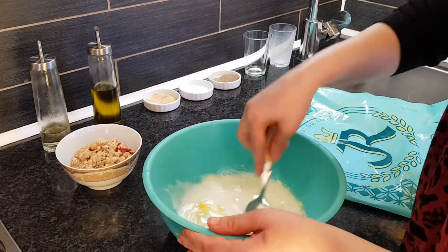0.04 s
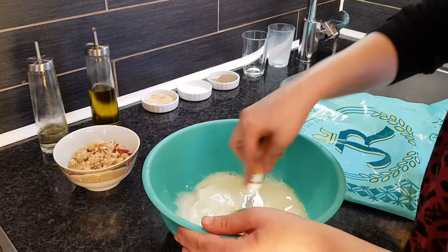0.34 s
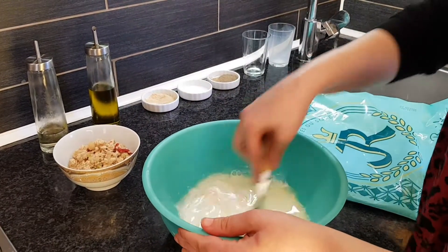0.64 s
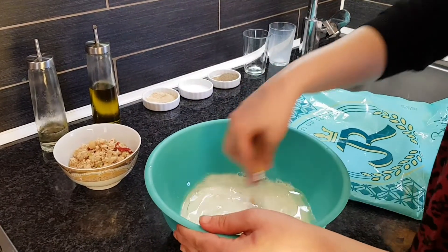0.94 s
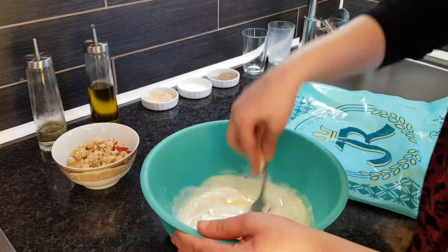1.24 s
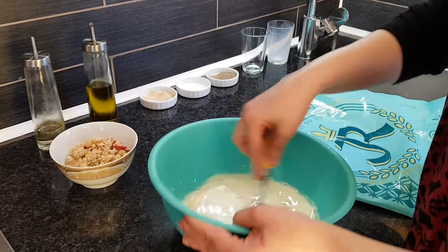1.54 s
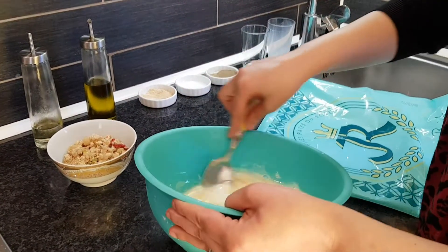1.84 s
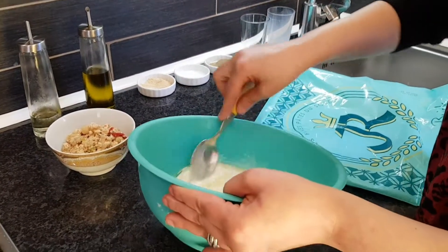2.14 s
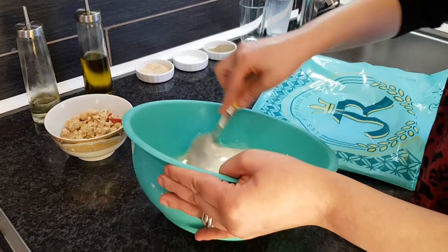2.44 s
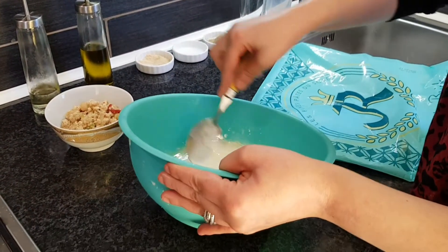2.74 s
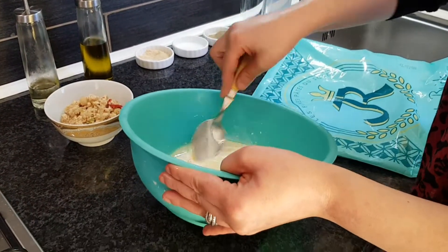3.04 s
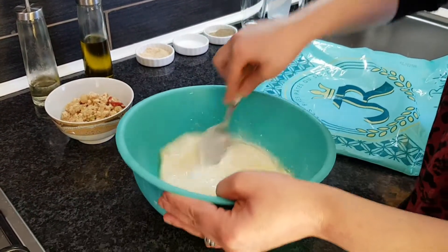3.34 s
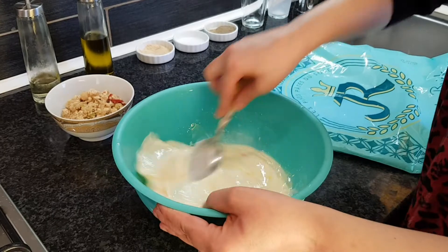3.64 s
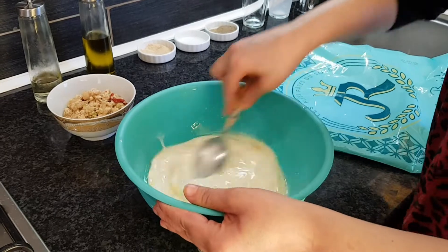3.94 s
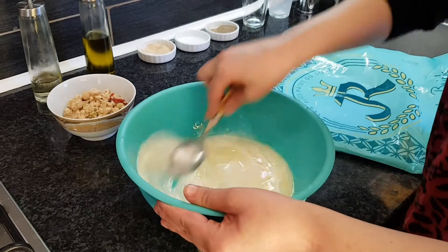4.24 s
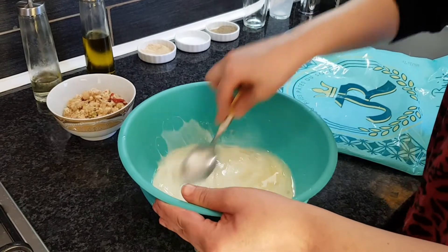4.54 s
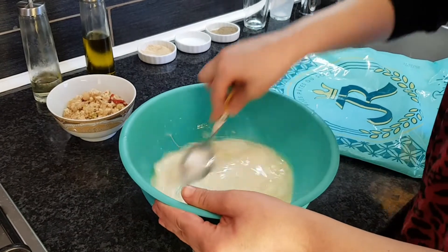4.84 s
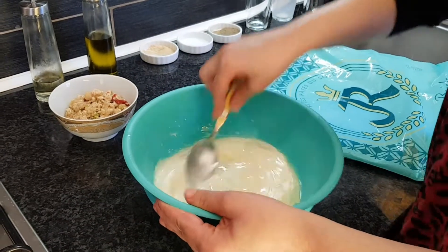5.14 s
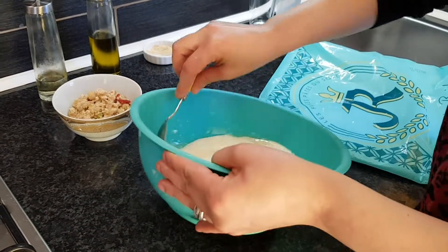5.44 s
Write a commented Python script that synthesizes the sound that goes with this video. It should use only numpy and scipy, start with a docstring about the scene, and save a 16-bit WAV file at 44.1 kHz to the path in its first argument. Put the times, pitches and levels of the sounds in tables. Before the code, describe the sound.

Close to the microphone and slightly left, a spoon works quickly through runny batter in a plastic bowl. Irregular hollow clacks and short scrapes mix with sticky swishes and bubbling plops. The batter goes quieter for a moment in the middle, then comes back wetter and busier. The bowl thumps softly as it rocks and the spoon clinks now and then, in a quiet tiled kitchen.

```python
"""A tiled kitchen, with a stereo microphone close to a hand-held plastic bowl on the counter.
A metal spoon beats a thin batter, about three turns a second. It knocks on wall and base, scrapes
along the plastic and now and then clinks; the batter slops, and air trapped in it squelches and plops.
The bowl, a little to the left, thumps as it rocks, and the tiles answer with a short tail."""
import sys
import numpy as np
from scipy import signal
from scipy.fft import rfft, irfft
from scipy.io import wavfile

SR = 44100
rng = np.random.default_rng(int(sys.argv[2]) if len(sys.argv) > 2 else 0)


def wrap_up_sound(samples):
    """Save the sound to the file named by the first command line argument, as 16-bit audio."""
    columns = np.atleast_2d(samples).T
    # keep every value between -1 and 1, then stretch to whole-number steps
    tamed = np.clip(columns, -1, 1)
    steps = np.round(tamed * 32767).astype(np.int16)
    wavfile.write(sys.argv[1], SR, steps)


N = 246739
RING_S = np.arange(8192) / SR  # time axis of one short sound
ONSET_SAMPLES = round(.02 * SR)

# spoon against bowl: start_s, level_db, depth (0 high on the wall, 1 on the base),
# coat (0 bare blade, 1 thick with batter), wall_pitch_hz
KNOCKS = [(0.558, -34.5, 1, 0.83, 1260), (0.569, -26, 0.49, 0.35, 1136), (0.597, -31, 0.84, 0.27, 1105),
          (0.835, -28, 0.83, 0.64, 1090), (0.856, -23, 0.53, 0.37, 1146), (0.867, -29.5, 0.068, 0.33, 1092),
          (0.9318, -23.5, 0.59, 0.77, 1145), (1.1725, -32, 0.58, 0.5, 1197), (1.366, -32, 0.36, 1, 1153),
          (1.4729, -33.5, 0.28, 0.3, 1160), (1.723, -45.5, 0.24, 1, 1210),
          (1.8093, -28.5, 0.34, 0.64, 1160), (1.816, -33.5, 0.21, 0.75, 1240),
          (1.8319, -29.5, 0.26, 0.22, 1280), (1.868, -33.5, 0.2, 0.44, 1110),
          (2.177, -43.5, 0.39, 0.9, 1150), (2.1821, -36, 0.4, 0.8, 1180), (2.2317, -30, 0.41, 0.16, 1196),
          (2.522, -36, 0.38, 0.2, 1340), (2.5563, -36, 0.32, 0.1, 1160), (2.8417, -33.5, 0.046, 0.7, 1170),
          (2.879, -25.5, 0.89, 0.43, 1116), (2.886, -39.5, 0.44, .7, 1080),
          (3.1349, -29.5, 0.36, 0.3, 1090), (3.239, -35, 0.058, 0.89, 1487), (3.342, -29, 0.047, 1, 1240),
          (3.437, -32, 0.16, 0.43, 1150), (3.507, -27, 0.41, 0.91, 1308), (3.596, -33.5, 0.08, 0.4, 1390),
          (3.7618, -30.5, 0.83, 0.3, 1160), (3.8136, -21, 0.57, 0.6, 1152), (4.064, -28, 0.79, 0.52, 1170),
          (4.1394, -23, 0.57, 0.42, 1064), (4.365, -30, 0.96, 0.64, 1110), (4.387, -27.5, 0.73, 0.56, 1120),
          (4.6218, -33, 0.76, 0.9, 1060), (4.718, -22.5, 0.54, 0.9, 1044),
          (4.9131, -33.5, 0.87, 0.88, 1390), (4.9442, -30, 0.33, 0.8, 1175),
          (5.0133, -31, 0.89, 0.84, 1090), (5.0205, -32, .8, 0.7, 1055), (5.094, -31, 0.71, 0.44, 1170),
          (5.375, -29, 0.78, 0.06, 1194), (5.529, -22, 0.14, 0.2, 1155), (5.57, -32, 0.62, 0.24, 1150)]
# spoon sliding over plastic: peak_s, length_s, level_db, depth (as above), wetness (0 to 1)
SCRAPES = [(0.057, 0.053, -43.5, 0.52, 0), (0.202, 0.029, -39, 0.34, 0.3), (0.309, 0.039, -38, 0.87, 0.36),
           (0.489, 0.048, -43.5, 0.6, 0.19), (0.654, 0.0073, -40, 0.77, 0.57), (0.797, 0.077, -48, 0.54, 0),
           (1.04, 0.11, -43, 0.16, 0.56), (1.21, 0.054, -41, 0.19, 0.05), (1.391, 0.042, -47.5, 0.59, 0),
           (1.47, 0.045, -36, 0.34, 0.33), (1.607, 0.023, -44.5, 0.2, 0.24), (1.776, 0.082, -48, 0.1, 0.18),
           (1.855, 0.0058, -74, .18, 0.1), (1.948, 0.029, -43.5, 0.35, 0.48),
           (2.226, 0.055, -49.5, 0.38, 0), (2.286, 0.028, -44.5, 0.62, 0.61),
           (2.533, 0.022, -48.5, 0.25, 0.06), (2.601, 0.031, -49.5, 0.6, 0.3),
           (2.919, 0.02, -46.5, 0.57, 0.74), (3.101, 0.058, -60, 0.62, 0.9),
           (3.192, 0.086, -45.5, 0.88, 0.72), (3.248, 0.03, -37.5, 0.038, 0.24),
           (3.347, 0.026, -37, 0.034, 0.4), (3.402, 0.044, -39.5, 0.12, 0.3),
           (3.506, 0.061, -38, 0.21, 0.6), (3.559, 0.032, -55, 0.3, 0), (3.661, 0.054, -39, 0.18, 0.32),
           (3.949, 0.061, -40.5, 0.074, 0.3), (4.094, 0.07, -39.5, 0.55, 0),
           (4.25, 0.053, -38.5, 0.13, 0.53), (4.406, 0.06, -38, 0.42, 0.4),
           (4.57, 0.049, -41.5, 0.49, 0.42), (4.68, 0.048, -44.5, 0.33, 0.56),
           (4.841, 0.054, -43, 0.074, 0.45), (4.968, 0.033, -45, .13, 0.4), (5.139, 0.064, -42, 0.64, 0),
           (5.514, 0.065, -45, 0.56, 0.88)]
# modes of the batter-laden base: pitch_hz, level_db, t60_s
BASE_MODES = [(200, -12.5, 0.04), (283, -2.5, 0.061), (366, -3, 0.091), (426.5, -7.5, 0.058),
              (513, -5, 0.12), (737, -5.5, 0.05), (730, 19, 0.0046), (836, 5, 0.033), (913, -5, 0.08),
              (1014, -13, 0.025)]
# modes of the bare wall: multiple_of_wall_pitch, level_db, t60_s
WALL_MODES = [(.88, -4, 0.015), (1, -3, 0.042), (1.14, 5, 0.002), (1.36, -2, 0.016), (1.56, -14, 0.013),
              (2.03, -25.5, 0.025), (2.4, -21, 0.019)]
# spectra of struck plastic, scraped plastic, and fine ticks and fizz: frequency_hz, level_db
CLACK_SPECTRUM = [(500, -8), (1200, -3.5), (1750, 2), (2300, 4), (2850, 3), (3300, -5), (5000, -11),
                  (7000, -23.5), (16000, -60.5)]
RASP_SPECTRUM = [(500, -30), (1200, -14), (1750, 3.5), (2300, 3.5), (2850, 0), (3400, -4), (5000, -9),
                 (7000, -21.5), (16000, -39.5)]
FIZZ_SPECTRUM = [(2500, -38), (5200, 1), (7300, -1), (10500, -0.5), (12000, -2), (13500, -7.5),
                 (16000, -10)]
# likeness of the microphone's two channels: frequency_hz, correlation
CHANNEL_LIKENESS = [(60, 0.9), (350, 0.98), (800, 0.61), (1300, 0.47), (2400, -0.069), (4500, 0.16),
                    (7000, -0.39), (16000, 0.38)]


def amp(db):
    """Decibels to amplitude."""
    return 10 ** (np.asarray(db) / 20)


def unit_rms(x):
    """Scales to rms 1."""
    return x / np.sqrt(np.mean(x ** 2) + 1e-20)


def unit_onset(x, size=ONSET_SAMPLES):
    """Scales so that the start of a blow has rms 1."""
    return x / np.sqrt(np.mean(x[..., :size] ** 2) + 1e-20)


def value_at(points, hz):
    """Reads a table on a log-frequency axis."""
    points_hz, values = np.transpose(points)
    return np.interp(np.log(hz + 1), np.log(points_hz + 1), values)


def add(mix, start_s, sound):
    """Mixes a sound in at its start time."""
    part = mix[:, max(round(start_s * SR), 0):][:, :sound.shape[-1]]
    part += sound[..., :part.shape[1]]


def pan(sound, side):
    """Places a sound between right (0) and left (1) at equal power."""
    return sound * np.sqrt([[side], [1 - side]])


def convolve(x, response):
    """Passes a signal through a response, keeping its length."""
    return signal.fftconvolve(np.atleast_2d(x), np.atleast_2d(response), axes=1)[:, :x.shape[-1]]


def colour(x, spectrum, size=4096):
    """Minimum-phase filter with the given spectrum."""
    log_gain = np.log(amp(value_at(spectrum, abs(np.fft.fftfreq(size, 1 / SR)))))
    response = np.fft.ifft(np.exp(np.conj(signal.hilbert(log_gain)))).real
    return convolve(x, response[:size // 2])


def mic_pair(x):
    """Makes two unrelated signals alike in the bass, as the stereo microphone hears them."""
    left, other = rfft(x)
    likeness = np.clip(value_at(CHANNEL_LIKENESS, np.fft.rfftfreq(x.shape[1], 1 / SR)), -1, 1)
    right = likeness * left + np.sqrt(1 - likeness ** 2) * other
    return irfft([left, right], x.shape[1])


def grains(per_s, spread_db):
    """Random clicks of uneven size, rms 1."""
    size = amp(spread_db * np.minimum(rng.exponential(1, N), 4)) * rng.choice([-1, 1], N)
    return unit_rms(size * (rng.random(N) < per_s / SR))


def clumps(per_s, depth_db):
    """Sticky batter holds and lets go in spurts: an uneven gain, rms 1."""
    t = np.arange(N) / SR
    hold = np.clip(rng.standard_normal(N), -2, 2)
    return unit_rms(amp(depth_db * np.interp(t * per_s, np.arange(N), hold)))


def scatter(t60_s):
    """A click bouncing about inside the bowl: dying stereo noise."""
    return mic_pair(rng.standard_normal((2, len(RING_S)))) * amp(-60 * RING_S / t60_s)


def burst(spectrum, t60_s):
    """A scattered click with the given spectrum."""
    return colour(scatter(t60_s), spectrum)


def ring(modes, scale=1, *, detune, uneven_db):
    """Dying modes; their strength, pitch and phase in each channel depend on the spot touched."""
    out = np.zeros((2, len(RING_S)))
    for pitch, db, t60_s in modes:
        gain, shift, phase = rng.standard_normal(3)
        hz = pitch * scale * (1 + detune * shift)
        phase_gap = np.arccos(np.clip(value_at(CHANNEL_LIKENESS, hz), -1, 1))
        lag = phase_gap * rng.choice([-.5, .5]) * np.array([[1], [-1]])
        envelope = amp(db + uneven_db * gain - 60 * RING_S / t60_s)
        out += envelope * np.sin(2 * np.pi * (hz * RING_S + phase) + lag)
    return out * (1 - np.exp(-RING_S / 0.00045))


def bubble(hz, cycles, glide):
    """A pocket of air rings briefly, rising in pitch as it dies."""
    age = RING_S * hz / cycles
    tone = np.sin(2 * np.pi * hz * RING_S * (1 + glide * np.minimum(age, 2)))
    return tone * np.exp(-3 * age) * (1 - np.exp(-12 * age))


def wander(x, responses, rounds_per_s):
    """Hands the signal from one response to the next as the spoon moves."""
    count, t = len(responses), np.arange(x.shape[-1]) / SR
    out = 0
    for k, response in enumerate(responses):
        away = abs((t * rounds_per_s * count - k + count / 2) % count - count / 2)
        share = np.cos(np.pi / 2 * np.minimum(away, 1))
        out = out + convolve(x * share, response / np.sqrt(np.sum(response ** 2) / 2))
    return out


def wall_and_base(db, depth):
    """Shares a level between wall and base by how deep in the bowl the spoon touches."""
    angle = np.pi / 2 * np.clip(depth, .02, .98)
    return db + 20 * np.log10([np.cos(angle), np.sin(angle)])


def strokes(rise_share=.53):
    """Yields for each scrape: peak_s, rise_s, fall_s, wall_db, base_db, rasp_db, fizz_db."""
    for peak_s, length_s, db, depth, wetness in SCRAPES:
        # a wet film lets the blade glide, so the bowl rings less and the film fizzes more
        wall_db, base_db = wall_and_base(db + 6.5 - 17 * wetness, depth)
        fizz_db = db - 36 + 33 * wetness
        yield peak_s, length_s * rise_share, length_s * (1 - rise_share), wall_db, base_db, db, fizz_db


def dragging(slack_db=10, stroke_s=0.12):
    """How much batter is on the move; it settles between strokes."""
    # batter dragged by the spoon: time_s, level_db
    # the bowl is tipped from 1.7 to 3.1 s and again near the end, leaving the blade clear
    stirring = [(0, -36.5), (.14, -53), (.3, -42), (.6, -46), (.85, -42.5), (1.38, -43), (1.6, -48.5),
                (2.0, -84), (3.0, -67.5), (3.27, -45), (3.42, -61), (3.54, -38), (3.66, -39.5), (3.78, -33),
                (3.88, -40.5), (4.0, -42), (4.2, -46.5), (4.4, -50), (4.62, -44), (5.14, -40.5),
                (5.27, -58), (5.59, -41)]
    t = np.arange(N) / SR
    speed = np.max([np.exp(-((t - peak_s) / stroke_s) ** 2) for peak_s, *_ in SCRAPES], axis=0)
    return amp(np.interp(t, *np.transpose(stirring)) + slack_db * (speed - 1))


def batter(slop_db=-3, swish_db=-5, wave_db=-9, settle_s=0.053):
    """Batter slops in coarse lumps and swishes with fine bursting films; deep knocks push up a wave."""
    # spectra of the lumps and of the films: frequency_hz, level_db
    slop_spectrum = [(30, -46), (70, -4), (140, -11), (290, 4.5), (360, 7), (440, 7), (530, 5), (630, 4),
                     (820, 0), (1150, 8.5), (1600, -36), (3000, -45.5)]
    swish_spectrum = [(500, -27.5), (1200, 10.5), (2750, 4.5), (3400, -7.5), (5200, -18), (7300, -24.5),
                      (11500, -20), (16000, -47)]
    t, drag = np.arange(N) / SR, dragging()
    wave = sum(amp(db) * depth * coat * (t > start_s) * np.exp(-abs(t - start_s) / settle_s)
               for start_s, db, depth, coat, _ in KNOCKS)
    lumps = np.hypot(amp(slop_db) * drag, amp(wave_db) * wave) * grains(per_s=200, spread_db=3.5)
    films = amp(swish_db) * drag * grains(per_s=450, spread_db=1.5) * clumps(per_s=90, depth_db=3)
    slop = wander(lumps, [burst(slop_spectrum, t60_s=0.037) for _ in range(5)], rounds_per_s=2.3)
    swish = wander(films, [burst(swish_spectrum, t60_s=0.017) for _ in range(7)], rounds_per_s=2.8)
    return slop + swish


def gurgle(level_db=-2.5, low_hz=420, high_hz=2600, spread_db=16, small_db=-5, count=220):
    """Air folded into the batter pops all through the stirring: hollow blips, some loud, some faint."""
    out = np.zeros((2, N))
    drag = dragging()
    for when, smallness, strength, side in rng.random((count, 4)):
        at = int(when * N)
        blip = bubble(low_hz * (high_hz / low_hz) ** smallness, cycles=17, glide=0.058)
        gain = drag[at] * amp(level_db + spread_db * strength + small_db * smallness)
        add(out, at / SR, pan(gain * blip, side))
    return out


def squelches(pop_db=-1, spit_db=-3, pitch_spread=0.22, spacing_s=0.0027, fade_db=1, count=4):
    """A pocket bursts with one wet spit and a quick run of tiny rising pops, each fainter."""
    # pockets of batter squeezed out from under the blade: start_s, level_db, pitch_hz
    pockets = [(0.0228, -47, 1350), (0.035, -40.5, 1500), (0.173, -57, 2060), (0.19, -47, 1840),
               (0.285, -49, 960), (0.312, -35, 1270), (0.589, -33.5, 1044), (0.75, -46.5, 1000),
               (1.201, -51, 1370), (1.443, -55, 1460), (1.59, -54, 1720), (1.678, -57, 1290),
               (3.082, -56.5, 4630), (3.112, -54.5, 2860), (3.318, -40, 1270), (3.534, -38, 1620),
               (3.558, -36, 940), (3.64, -39, 1770), (3.672, -41, 1660), (3.945, -47.5, 3500),
               (3.893, -44, 2000), (4.376, -40.5, 3650), (4.53, -48, 880), (4.557, -40.5, 1800),
               (4.651, -37.5, 1350), (4.835, -58, 1810), (5.127, -34.5, 1284)]
    out = np.zeros((2, N))
    for start_s, db, middle_hz in pockets:
        add(out, start_s, amp(db + spit_db) * unit_onset(burst(CLACK_SPECTRUM, t60_s=0.075)))
        for k, (late, pitch, side) in enumerate(rng.random((count, 3))):
            hz = middle_hz * np.exp(pitch_spread * (2 * pitch - 1))
            pop = amp(db + pop_db - fade_db * k) * unit_onset(bubble(hz, cycles=12, glide=0.017))
            add(out, start_s + (k + late) * spacing_s, pan(pop, side))
    return out


def scrapes(wall_hz=1230, wall_db=-3, base_db=-2, rasp_db=0.43, fizz_db=-1):
    """Tiny slips under the pressure of each stroke rasp and ring wall and base; wet films fizz."""
    t = np.arange(N) / SR
    power = np.zeros((4, N))
    for peak_s, rise_s, fall_s, *levels_db in strokes():
        pressure = np.exp(-((t - peak_s) / np.where(t < peak_s, rise_s, fall_s)) ** 2)
        power += amp(levels_db)[:, None] ** 2 * pressure
    wall, base, rasp, fizz = np.sqrt(power) * grains(per_s=1100, spread_db=2.5)
    rasp *= clumps(per_s=120, depth_db=2.5)
    fizz *= clumps(per_s=150, depth_db=3)
    wall_spots = [ring(WALL_MODES, wall_hz, detune=0.184, uneven_db=13.5) for _ in range(7)]
    base_spots = [ring(BASE_MODES, detune=0.018, uneven_db=0.5) for _ in range(5)]
    rasp_spots = [burst(RASP_SPECTRUM, t60_s=0.013) for _ in range(9)]
    fizz_spots = [burst(FIZZ_SPECTRUM, t60_s=0.0011) for _ in range(5)]
    return (amp(wall_db) * wander(wall, wall_spots, rounds_per_s=1.1)
            + amp(base_db) * wander(base, base_spots, rounds_per_s=1.7)
            + amp(rasp_db) * wander(rasp, rasp_spots, rounds_per_s=6.1)
            + amp(fizz_db) * wander(fizz, fizz_spots, rounds_per_s=2.3))


def crackle(smack_db=-11, tick_db=-13, spread_db=11, count=5):
    """Sticky films tear off the blade one by one during each stroke; thin films sound higher."""
    out = np.zeros((2, N))
    for peak_s, rise_s, fall_s, _, _, rasp_db, fizz_db in strokes():
        for when, strength, thinness in rng.random((count, 3)):
            smack = amp(rasp_db + smack_db) * unit_onset(burst(RASP_SPECTRUM, t60_s=0.03))
            tick = amp(fizz_db + tick_db) * unit_onset(burst(FIZZ_SPECTRUM, t60_s=0.0035))
            tear = (1 - thinness) * smack + thinness * tick
            add(out, peak_s - rise_s + when * (rise_s + fall_s), amp(spread_db * strength ** 2) * tear)
    return out


def stroke_bubbles(level_db=7, low_hz=750, spread_db=12, count=6):
    """Each stroke bursts pockets of air; large ones follow the wall's level, small ones the rasp's."""
    out = np.zeros((2, N))
    for peak_s, rise_s, fall_s, wall_db, _, rasp_db, _ in strokes():
        for when, smallness, strength, side in rng.random((count, 4)):
            blip = bubble(low_hz * 5 ** smallness, cycles=13, glide=0.12)
            db = (1 - smallness) * wall_db + smallness * rasp_db + level_db + spread_db * strength ** 2
            add(out, peak_s - rise_s + when * (rise_s + fall_s), pan(amp(db) * blip, side))
    return out


def thumps(bump_db=-5.5, nudge_db=-31, rise_s=0.014):
    """The whole bowl thumps when it rocks onto the counter, and faintly after every knock."""
    # the bowl meets the counter: start_s, level_db
    bumps = [(0.075, -53), (0.575, -43), (0.86, -61), (0.932, -37.5), (1.01, -45), (1.185, -63),
             (1.325, -42.5), (1.362, -43), (1.41, -54), (1.833, -41.5), (2.182, -37), (2.232, -47),
             (2.522, -43.5), (2.556, -43.5), (2.842, -40), (2.88, -38), (2.98, -54), (3.135, -40.5),
             (3.438, -45), (4.14, -42), (4.387, -40), (5.014, -38.5), (5.376, -47), (5.53, -51)]
    # spectrum of a thump: frequency_hz, level_db
    thump_spectrum = [(20, -30), (40, -9), (58, 1.5), (95, -3.5), (140, -5), (220, -14.5), (500, -56),
                      (2000, -78.5)]
    out = np.zeros((2, N))
    swell = 1 - np.exp(-RING_S / rise_s)
    for events, level_db in (bumps, bump_db), (KNOCKS, nudge_db):
        for start_s, db, *_ in events:
            rocking = colour(scatter(t60_s=0.14) * swell, thump_spectrum)
            add(out, start_s, amp(db + level_db) * unit_onset(rocking, size=3 * ONSET_SAMPLES))
    return out


def wipes():
    """A film shearing under the blade breaks in tiny bursts: an airy swish that leaves the bowl still."""
    # the flat of the blade passes through a thin film: peak_s, half_width_s, level_db
    passes = [(0.21, 0.033, -51), (1.038, 0.038, -45.5), (1.973, 0.018, -56), (3.358, 0.019, -38.5),
              (4.234, 0.028, -36)]
    # spectrum of a wipe: frequency_hz, level_db
    wipe_spectrum = [(500, -33), (1200, -27), (3300, 2), (4500, -5), (6000, -3.5), (7500, -10.5),
                     (11500, -15), (16000, -35)]
    t = np.arange(N) / SR
    pressure = sum(amp(db) * np.exp(-((t - peak_s) / width_s) ** 2) for peak_s, width_s, db in passes)
    bursts = mic_pair(np.array([grains(per_s=5500, spread_db=0) for _ in range(2)]))
    return pressure * unit_rms(colour(bursts * clumps(per_s=510, depth_db=0.5), wipe_spectrum))


def knocks(wall_gain_db=-0.67, base_gain_db=-6, thud_db=-6, clack_db=-4.5, tick_db=-14):
    """Each blow clacks, rings wall and base and thuds in the batter; a bare blade adds a metal tick."""
    # dull thud of a blow through the batter: frequency_hz, level_db
    thud_spectrum = [(60, -24.5), (130, -8.5), (190, 0.5), (290, -0.5), (520, 3), (630, -5), (820, 11),
                     (1100, -15.5), (1600, -1), (4000, -35.5)]
    out = np.zeros((2, N))
    for start_s, db, depth, coat, wall_hz in KNOCKS:
        wall_db, base_db = wall_and_base(db, depth)
        # a coat of batter lengthens the contact, rounds the attack and muffles clack and tick
        contact_s = 0.00074 + 0.0033 * coat ** 8.8
        swell = 1 - np.exp(-(RING_S / contact_s) ** 2)
        wall = swell * ring(WALL_MODES, wall_hz, detune=0.019, uneven_db=6)
        base = swell * ring(BASE_MODES, detune=0.024, uneven_db=5.5)
        thud = swell * burst(thud_spectrum, t60_s=0.15)
        touch = scatter(t60_s=0.012 + 8 * contact_s) + 0.11 * scatter(t60_s=0.26)
        clack = colour(swell * touch, CLACK_SPECTRUM)
        tick = swell * colour(scatter(t60_s=0.0073) + 0.25 * scatter(t60_s=0.08), FIZZ_SPECTRUM)
        add(out, start_s, amp(wall_db + wall_gain_db) * unit_onset(wall))
        add(out, start_s, amp(base_db + base_gain_db) * unit_onset(base))
        add(out, start_s, amp(base_db + thud_db) * unit_onset(thud))
        add(out, start_s, amp(db + clack_db - 9 * coat) * unit_onset(clack))
        add(out, start_s, amp(db + tick_db - 43 * coat) * unit_onset(tick))
    return out


def snaps(ring_share=0.104):
    """The blade's edge snaps against the plastic and leaves a faint ring in the bowl."""
    # edge contacts, the finer the higher: start_s, level_db, centre_hz
    contacts = [(0.570, -40, 2400), (0.655, -57, 8060), (0.8563, -37.5, 2400), (0.8683, -35.5, 2250),
                (1.8325, -56, 2580), (1.868, -37.5, 1870), (2.1823, -52, 5050), (2.511, -57.5, 7960),
                (2.5229, -48, 4600), (2.5562, -49.5, 5440), (2.839, -47, 12500), (2.842, -37.5, 13500),
                (2.8795, -44, 4570), (3.1357, -46, 5760), (3.512, -32, 1890), (3.595, -46, 1970),
                (3.7212, -54, 11000), (3.7244, -54.5, 11000), (3.763, -37, 2420), (3.815, -48.5, 10000),
                (3.817, -31.5, 1050), (4.081, -36.5, 2010), (4.1418, -41, 4500), (4.2525, -47, 11500),
                (4.389, -31.5, 1800), (4.394, -35, 1770), (4.721, -52, 3000), (4.7275, -32, 1060),
                (4.889, -59, 11600), (4.9465, -36, 1630)]
    # spectrum of a snap: multiple_of_centre, level_db
    snap_shape = [(.2, -21), (.55, -3.5), (1, 2.5), (1.4, -4.5), (2.2, -24), (5, -45)]
    out = np.zeros((2, N))
    for start_s, db, centre_hz in contacts:
        spectrum = [(multiple * centre_hz, level_db) for multiple, level_db in snap_shape]
        snap = scatter(t60_s=0.0049) + ring_share * scatter(t60_s=0.087)
        add(out, start_s, amp(db) * unit_onset(colour(snap, spectrum)))
    return out


def gulps(level_db=-3, cycles=12, glide=0.02, small_db=-13, pitch_spread=0.7, within_s=0.085, count=2):
    """Batter closes behind the blade over a large pocket of air, which plops; smaller ones follow."""
    # large pockets of trapped air: start_s, level_db, pitch_hz
    pockets = [(0.573, -30, 315), (0.834, -36, 350), (0.93, -17.5, 268.6), (1.222, -36, 330),
               (1.473, -24.5, 415), (3.509, -27.5, 299), (3.569, -30, 298), (3.723, -32.5, 253),
               (3.814, -24.5, 263), (4.063, -33, 360), (4.137, -26.5, 235), (4.386, -25.5, 372),
               (4.624, -25, 335), (4.721, -28, 244), (5.013, -21, 270), (5.093, -37, 350)]
    out = np.zeros((2, N))
    for start_s, db, hz in pockets:
        add(out, start_s, amp(db + level_db) * bubble(hz, cycles, glide))
        for when, smallness in rng.random((count, 2)):
            blip = bubble(hz * np.exp(pitch_spread * smallness), cycles, glide)
            add(out, start_s + when * within_s, amp(db + level_db + small_db) * blip)
    return out


def clinks(rattle_db=-5, tick_db=-11, body_db=-9, contact_s=0.00079):
    """The spoon rings and chatters when it glances off the wall clear of the batter."""
    # glancing blows: start_s, level_db
    glances = [(2.7693, -37), (5.373, -33.5), (5.481, -47)]
    # modes of the spoon: pitch_hz, level_db, t60_s
    spoon_modes = [(1260, -16, 0.025), (2020, -5.5, 0.091), (2103, -10, 0.095), (2300, -9.5, 0.083),
                   (2580, -2, 0.022), (5320, -6.5, 0.02), (6050, -11.5, 0.022), (6100, -10, 0.032)]
    # the bowl's answer to a clink: frequency_hz, level_db
    body_spectrum = [(150, -27), (450, -7), (900, 6), (1600, 17), (4000, -66)]
    out = np.zeros((2, N))
    swell = 1 - np.exp(-RING_S / contact_s)
    for start_s, db in glances:
        metal = unit_onset(ring(spoon_modes, detune=.006, uneven_db=1.5))
        tick = amp(tick_db) * unit_onset(burst(FIZZ_SPECTRUM, t60_s=0.09))
        rattle = amp(rattle_db) * unit_onset(burst(RASP_SPECTRUM, t60_s=0.18))
        body = amp(body_db) * unit_onset(burst(body_spectrum, t60_s=0.15))
        add(out, start_s, amp(db) * (metal + tick + rattle + body) * swell)
    return out


def room_tone(level_db=-66):
    """The still kitchen: a faint, steady noise under everything."""
    # spectrum of the room tone: frequency_hz, level_db
    room_spectrum = [(20, -27), (70, -7), (200, -6.5), (600, -42), (2000, -23), (5000, -19), (7500, -27.5),
                     (12000, -18), (16000, -20)]
    return amp(level_db) * unit_rms(colour(mic_pair(rng.standard_normal((2, N))), room_spectrum))


def kitchen_tail(direct, onset_s=0.0021, count=5):
    """Dense reflections from counter and tiles, each band dying at its own speed."""
    # decay of the kitchen: frequency_hz, t60_s
    decay_times = [(60, 1), (160, 0.47), (420, 0.28), (1100, 0.28), (3000, 0.17), (8000, 0.29),
                   (16000, 0.13)]
    # the tail against the direct sound: frequency_hz, level_db
    tail_spectrum = [(60, -8.5), (300, -2), (1200, -4.5), (2500, -1.5), (8000, -2), (16000, -2.5)]
    tails = []
    for _ in range(count):
        hz, t, bands = signal.stft(mic_pair(rng.standard_normal((2, SR // 2))), SR, nperseg=256)
        t60_s = value_at(decay_times, hz)[:, None]
        _, tail = signal.istft(bands * amp(-60 * t / t60_s) / np.sqrt(t60_s), SR, nperseg=256)
        fade_in = np.clip(np.arange(tail.shape[1]) / SR / onset_s - .5, 0, 1)
        tails.append(tail * fade_in)
    return colour(wander(direct, tails, rounds_per_s=0.9036), tail_spectrum)


def scene():
    """Spoon, bowl and batter up close, with the room tone and the tail from the tiles behind them."""
    bowl = knocks() + thumps() + snaps() + clinks() + scrapes()
    mixture = wipes() + crackle() + squelches() + batter() + gurgle() + stroke_bubbles() + gulps()
    direct = bowl + mixture
    return direct + room_tone() + kitchen_tail(direct)


def record(dry, cutoff_hz=15900):
    """The close stereo microphone has the bowl a little to its left; the highest treble is cut."""
    # balance between the channels: frequency_hz, left_minus_right_db
    balance = [(60, 3), (350, 2), (1200, 3.5), (2400, 0), (5000, 0), (8000, -1), (14000, 1)]
    lean_db = value_at(balance, np.fft.rfftfreq(N, 1 / SR)) * np.array([[.5], [-.5]])
    heard = irfft(rfft(dry) * amp(lean_db), N)
    lowpass = signal.firwin(511, cutoff_hz, window=("kaiser", 9), fs=SR)
    return signal.oaconvolve(heard, lowpass[None], "same")


dry = scene()
out = record(dry)
wrap_up_sound(out)
```